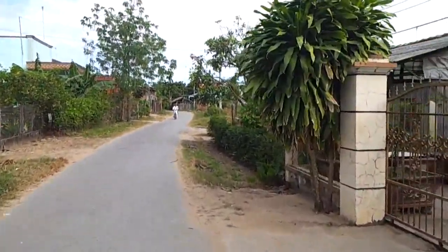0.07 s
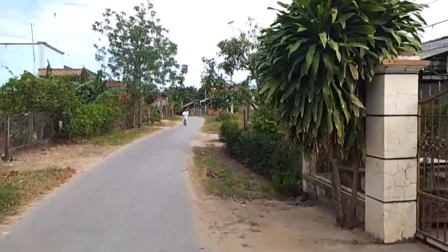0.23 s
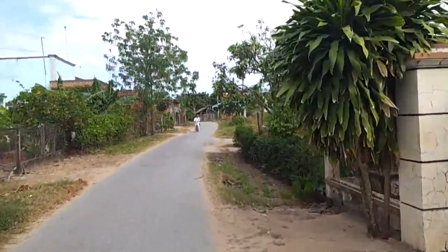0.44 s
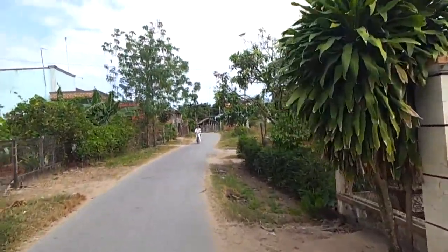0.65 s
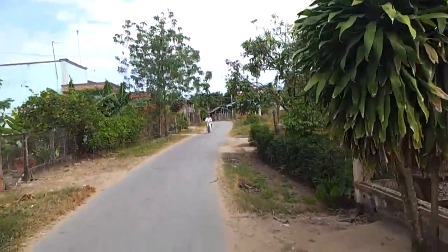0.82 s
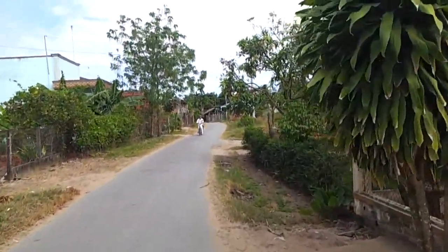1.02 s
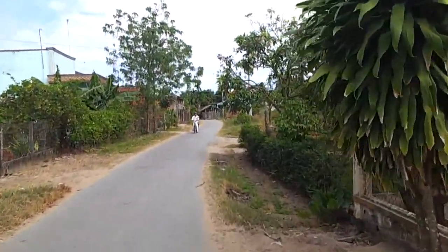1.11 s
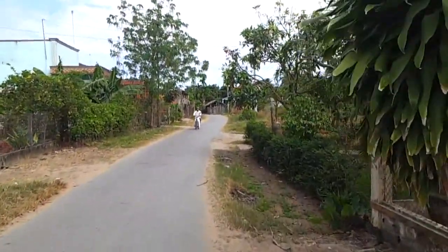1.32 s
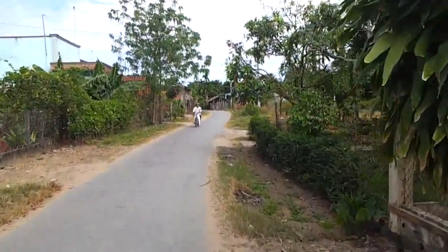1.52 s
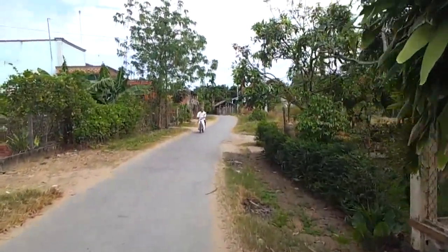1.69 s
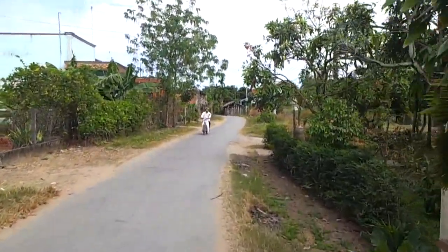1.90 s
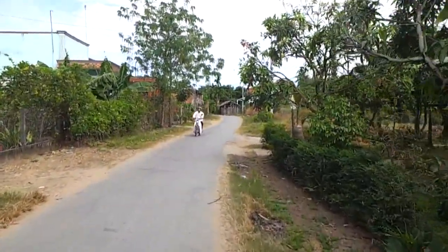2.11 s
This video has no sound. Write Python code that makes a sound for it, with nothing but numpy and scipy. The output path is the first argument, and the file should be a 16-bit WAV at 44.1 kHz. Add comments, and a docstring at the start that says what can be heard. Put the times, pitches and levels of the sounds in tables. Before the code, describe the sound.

An old bicycle squeaks close to the microphone, jumping between high and lower pitches as it rolls along a country lane. The freewheel ticks and tyres hiss throughout, while a head wind rumbles and pops on the microphone.

```python
"""Old bicycle in a head wind

A country lane between walls and hedges, with a stereo microphone close to a rolling bicycle.
Dry metal parts rub and squeal, jumping from pitch to pitch, while the freewheel ticks and the tyres hiss.
The head wind rumbles, pops and briefly overloads the microphone, mostly on the left."""
import sys
import numpy as np
from scipy import signal
from scipy.fft import rfft, irfft, next_fast_len
from scipy.io import wavfile
from scipy.ndimage import uniform_filter1d

SR = 44100
rng = np.random.default_rng(int(sys.argv[2]) if len(sys.argv) > 2 else 0)


def output_pcm(signal):
    """Save a mono or channel-first signal as 16-bit PCM at the path in sys.argv[1].

    Samples are clipped to [-1, 1] before scaling.
    """
    pcm = np.clip(np.atleast_2d(signal).T, -1, 1) * 32767
    wavfile.write(sys.argv[1], SR, np.round(pcm).astype(np.int16))


N = 94815
TIME = np.arange(N) / SR
RUB_ATTACK_S, RUB_RELEASE_S = 0.0057, 0.008
CUTOFF_HZ = 14350

# four long squeals, close up: (time [s], pitch [Hz], level before the squeal's gain [dB])
RISING = [(0.0, 6560, -24), (0.012, 6660, -33.5), (0.04, 6650, -26.5), (0.046, 6568, -37),
          (0.08, 6949, -27), (0.11, 6960, -46.5)]
LOUD = [(0.647, 5610, -30), (0.661, 5394, -28), (0.697, 5384, -37.5), (0.713, 5382, -23.5),
        (0.733, 5190, -37), (0.755, 5230, -48)]
THIN = [(0.872, 8373, -45), (0.882, 8380, -31.5), (0.9, 8380, -44), (0.92, 8420, -25), (0.984, 8180, -43.5),
        (1.034, 8070, -31), (1.05, 8140, -33.5), (1.075, 8140, -55)]
LOW = [(1.3, 2494, -42), (1.366, 2290, -39.5), (1.378, 2140, -30), (1.408, 2030, -27.5),
       (1.516, 2123, -44.5), (1.528, 2133, -31.5), (1.544, 2057, -25.5), (1.574, 2047, -45),
       (1.582, 2135, -51), (1.596, 2070, -23), (1.618, 2188, -46), (1.626, 1993, -27), (1.646, 2122, -40),
       (1.655, 2117, -54)]
# their voices: (curve, gain [dB], roughness [0-1], harmonics from the 2nd up [dB])
SQUEALS = [(RISING, 1.9, 0.24, [-11]), (LOUD, 2.1, 0.3, [-3]), (THIN, -.5, .18, []),
           (LOW, 0.42, 0.514, [-21, -23, -27, -22, -24])]
# short squeaks: (start [s], length [s], first, middle and last pitch [Hz], level [dB],
# 2nd harmonic [dB], 3rd [dB], 4th and 5th [dB], roughness [0-1])
SQUEAKS = [(.243, 0.024, 1673, 1640, 1710, -54, 1, -1, -14, 0.87),
           (.288, 0.023, 2990, 3030, 2992, -47.5, -15.5, -5, -20, 0.32),
           (.368, 0.034, 2320, 2250, 2420, -40.5, 5.5, -12, -4.5, 0.29),
           (0.421, 0.059, 2416, 2484, 2390, -42, -7, -25, -11, 0.096),
           (.484, 0.048, 3180, 3212, 3190, -29, -15, -8, -13, 0.21),
           (0.532, 0.02, 3260, 3070, 3000, -32, -8, -22, -23, 0.36),
           (.590, 0.041, 2480, 2492, 2420, -32, -8.5, -27.5, -26, 0.076),
           (1.205, 0.055, 3380, 3170, 3030, -49, -7, -21.5, -20, .6),
           (1.497, 0.023, 6350, 6420, 6340, -33.5, -6, -20, -20, 0.074),
           (2.069, 0.028, 8480, 8600, 8360, -35, -20, -20, -20, .1)]


def squeaks():
    """Dry metal sticks and slips, singing long squeals and short squeaks."""
    out = np.zeros((2, N))
    for curve, gain_db, rough, harmonics_db in SQUEALS:
        hz, db = in_time(curve)
        out += stick_slip(curve[0][0], curve[-1][0], hz, db + gain_db, rough, harmonics_db)
    for start, length, first, middle, last, db, second_db, third_db, higher_db, rough in SQUEAKS:
        hz = np.interp(TIME, start + np.linspace(0, length, 3), [first, middle, last])
        out += stick_slip(start, start + length, hz, db, rough, [second_db, third_db, higher_db, higher_db])
    return out


# how the microphone's two unequal sides colour the bicycle; the left favours high treble,
# the right most of 3-7 kHz: (frequency [Hz], left minus right [dB])
MIC_BALANCE = [(1600, 1), (2080, 3), (2480, -0.5), (3200, -12.5), (4600, 8), (5400, -16.5), (6800, -11),
               (8300, 7), (10800, 21.5), (13400, 13)]


def stick_slip(start, end, hz, db, rough, harmonics_db):
    """A rubbing contact sings one pitch with overtones; a rough grip shakes its pitch and level."""
    flutter_db = 8 * rough * drift(hz=71)
    level = gate(start, end, RUB_ATTACK_S, RUB_RELEASE_S) * from_db(db + flutter_db)
    wobble = 0.0237 * rough * drift(hz=128.4)
    on = level > 0
    phase = 2 * np.pi * np.cumsum((hz * (1 + wobble))[on]) / SR
    out = np.zeros((2, N))
    for k, harmonic_db in enumerate([0, *harmonics_db], 1):
        if k * hz.min() < CUTOFF_HZ:
            partial = np.sqrt(2) * from_db(harmonic_db) * level[on] * np.sin(k * phase)
            out[:, on] += sides(at_hz(MIC_BALANCE, k * hz[on])) * partial
    return out


# dry scrapes: (start [s], length [s], centre [Hz], width [Hz], level [dB])
SCRAPES = [(0.267, 0.0485, 2600, 700, -41), (0.265, 0.028, 4740, 1020, -42), (1.25, 0.03, 1530, 900, -36.5),
           (1.308, 0.035, 4820, 400, -43), (1.382, 0.015, 6000, 2000, -41.5),
           (1.609, 0.038, 2113, 280, -30), (1.617, 0.01, 3980, 300, -24.5),
           (1.618, 0.0092, 10520, 300, -29.5)]


def scrapes():
    """The contact rasps through a resonance without singing."""
    out = np.zeros((2, N))
    for start, length, hz, width_hz, db in SCRAPES:
        band_hz = [hz - width_hz / 2, hz + width_hz / 2]
        rasp = rms_one(filtered(rng.standard_normal(N), band_hz, "band"))
        level = from_db(db) * gate(start, start + length, RUB_ATTACK_S, RUB_RELEASE_S)
        out += sides(at_hz(MIC_BALANCE, hz)) * rasp * level
    return out


# the pawl's bright click: (frequency [Hz], relative level [dB])
TICK_COLOUR = [(1500, -60), (4000, 21), (5500, 3), (7300, -19), (9000, 13), (10200, -5), (11700, 20.5),
               (14000, -29)]


def freewheel(first_s=0.0065, gap_s=0.0367, slowing_s=0.000017, decay_s=0.0038):
    """The pawl drops over each tooth in turn, slowing slightly; each drop is a short tick."""
    drops = np.zeros(N)
    for k, db in enumerate(1.5 * rng.standard_normal(size=60)):
        drop_s = first_s + gap_s * k + slowing_s * k * k
        drops[TIME.searchsorted(drop_s):][:1] += from_db(db)
    envelope = signal.lfilter([1], [1, -np.exp(-1 / (decay_s * SR))], drops)
    ticks = envelope * noise(TICK_COLOUR) * from_db(-38 + 2.5 * TIME)  # growing louder
    balance_db = at_hz(MIC_BALANCE, np.fft.rfftfreq(N, 1 / SR))
    return irfft(rfft(ticks) * sides(balance_db), N)


# tyres and chain on the lane, each side: (frequency [Hz], relative level [dB])
ROLL_LEFT = [(100, 8.5), (600, -5), (1050, 2.5), (1380, -1.5), (1650, 2), (2500, -5), (4000, -14),
             (7000, -15), (9000, -10), (11500, -2.5), (13000, -9.5), (14500, -13)]
ROLL_RIGHT = [(100, 12.5), (600, 4.5), (1050, 2.5), (1380, -1.5), (1650, 2), (2500, -4.5), (4000, -2.5),
              (5500, -1.5), (7500, -11), (10000, -16.5), (14500, -31)]
# their level before the swell: (left [dB], right [dB])
ROLL_DB = [-40.5, -39.5]
# their slow swell: (time [s], gain [dB])
ROLL_SWELL = [(0, 0.5), (.3, 1.5), (.7, 1), (1.05, 1), (1.35, 3), (1.7, 3), (2.15, 4)]


def rolling():
    """Tyres and chain run with a grainy hiss."""
    swell_db, = in_time(ROLL_SWELL)
    grain_db = 1.26 * drift(hz=143)
    return np.array([noise(colour) * from_db(db + swell_db + grain_db)
                     for colour, db in zip((ROLL_LEFT, ROLL_RIGHT), ROLL_DB)])


# head wind right on the microphone: (time [s], left level [dB], right level [dB])
WIND = [(0, -28, -66), (.15, -27, -33), (.24, -29.5, -27), (.31, -32.5, -42), (.42, -27, -35),
        (.52, -28, -43), (.68, -31, -33), (.79, -21.5, -35), (.92, -22, -22.5), (.99, -30.5, -42),
        (1.06, -23, -26), (1.18, -23.5, -27.5), (1.35, -23, -29), (1.5, -23, -35.5), (1.62, -20, -22),
        (1.71, -24, -29), (1.82, -18, -31), (1.95, -25.5, -36), (2.15, -23, -23)]
# its rumble: (frequency [Hz], relative level [dB])
WIND_COLOUR = [(15, -0.5), (30, -1), (80, 2), (150, -3.5), (300, -15.5), (600, -26.5), (1200, -48.5),
               (3000, -65)]


def wind(lump_db=3, lump_hz=24.7):
    """Air flowing over the microphone makes a lumpy rumble, unrelated on the two sides."""
    return np.array([noise(WIND_COLOUR) * from_db(db + lump_db * drift(lump_hz)) for db in in_time(WIND)])


# gusts hitting the microphone: (start [s], length [s], level [dB], left minus right [dB])
GUSTS = [(0.195, 0.046, -25.5, -2.5), (0.565, 0.018, -17, 27), (0.587, .058, -12, 30),
         (0.65, 0.0326, -18.5, 24), (0.69, 0.077, -21.5, 33), (0.821, .016, -21, 9),
         (0.848, .02, -2.5, 45.5), (0.869, 0.027, -17, 33), (1.031, 0.035, -30, 12),
         (1.155, 0.022, -24.5, 5), (1.201, 0.0183, -21, 4.5), (1.324, 0.055, -27.5, 6.5),
         (1.477, 0.043, -23, -5.5), (1.781, 0.0225, -18, 19), (1.816, 0.019, -21.5, 6)]
# their low thud: (frequency [Hz], relative level [dB])
GUST_COLOUR = [(20, -41), (70, -19), (140, 10.5), (300, 0), (600, -15.5), (1200, -31), (3000, -47.5),
               (8000, -67)]


def gusts(edge_s=0.0041, even_s=0.0135):
    """Short, hard buffets, with separate turbulence at each microphone port."""
    air = np.array([noise(GUST_COLOUR), noise(GUST_COLOUR)])
    local_rms = np.sqrt(uniform_filter1d(air ** 2, int(even_s * SR), axis=1) + 1e-9)
    level = sum(sides(balance_db) * from_db(db) * gate(start, start + length, edge_s, edge_s)
                for start, length, db, balance_db in GUSTS)
    return air / local_rms * level


# single eddies on the microphone:
# (time [s], depth before filtering [dB], half width [ms], left minus right [dB])
POPS = [(.114, -13.5, 0.74, -22), (0.2114, -3, 1.53, 25.5), (0.223, -18.5, 1.8, -28),
        (0.4075, -8.5, 0.94, 32.5), (0.4177, 1, 0.737, 25), (0.575, -4, 0.55, 31), (0.589, 3.5, 0.51, 26),
        (0.5974, -3, 0.87, 30), (0.6135, 13.5, 0.5, 45.5), (0.622, 4.5, 0.87, 28), (.629, -1.5, 0.2, 30),
        (0.6392, 9.5, 0.29, 45), (0.6607, 0.5, 0.75, 30), (0.676, -3.5, 0.76, -38), (0.697, -9, 0.66, -17),
        (0.723, -6, 0.62, 18.5), (.830, -4.5, 0.48, 20), (.848, 10.5, 0.76, 48), (0.8548, 10, 0.82, 42),
        (0.8623, 1, 1.4, 38), (0.876, -3.5, 0.66, 30), (1.093, -6.5, 1.34, 17.5), (1.157, -9, 1.05, -18.5),
        (1.332, -5.5, 2.3, 19), (1.746, -7.5, 0.48, -20), (1.793, -4, 4.1, 31), (1.8101, 4.5, 0.23, 31),
        (1.880, -4.5, 1.44, 32.5)]


def pops():
    """Each eddy is a pointed dip in pressure that swings back; smaller eddies carry less bass."""
    out = np.zeros((2, N))
    for centre_s, db, half_width_ms, balance_db in POPS:
        half_width_s = half_width_ms / 1000
        dip = -from_db(db) * np.exp(-np.minimum(abs(TIME - centre_s) / half_width_s, 30))
        out += sides(balance_db) * filtered(dip, hz=0.079 / half_width_s, kind="high")
    return filtered(out, hz=1260, kind="low", order=5)


def lane(sound, t60_s=0.314, delay_s=0.0039, db=-11.5):
    """Walls and hedges scatter a short tail back to the microphone."""
    t = TIME[:SR // 2]
    tails = rng.standard_normal((2, len(t))) * from_db(-60 * t / t60_s) * (t > delay_s)
    tails /= np.sqrt(np.sum(tails ** 2, axis=1, keepdims=True))
    return from_db(db) * signal.fftconvolve(sound, tails, axes=1)[:, :N]


def from_db(db):
    return 10 ** (np.asarray(db) / 20)


def rms_one(x):
    return x / np.sqrt(np.mean(x ** 2) + 1e-20)


def filtered(x, hz, kind, order=2):
    return signal.sosfilt(signal.butter(order, hz, kind, fs=SR, output="sos"), x)


def in_time(rows):
    """The columns of a table as curves over time."""
    times, *columns = np.transpose(rows)
    return [np.interp(TIME, times, column) for column in columns]


def at_hz(points, hz):
    """Reads a spectrum on a log-frequency axis."""
    points_hz, points_db = np.transpose(points)
    return np.interp(np.log(hz + 1e-9), np.log(points_hz), points_db)


def noise(colour):
    """Noise with the given spectrum; rms 1."""
    size = next_fast_len(N)
    gains = from_db(at_hz(colour, np.fft.rfftfreq(size, 1 / SR)))
    return rms_one(irfft(rfft(rng.standard_normal(size)) * gains, size)[:N])


def drift(hz):
    """Random motion slower than hz; rms 1."""
    return rms_one(filtered(rng.standard_normal(N + SR), hz, "low")[SR:])


def sides(balance_db):
    """Left and right gains of mean power 1."""
    ratio = from_db(np.atleast_1d(balance_db))
    return np.array([ratio, np.ones_like(ratio)]) * np.sqrt(2 / (1 + ratio ** 2))


def gate(start, end, attack, release):
    """Rises, holds and falls, with rounded corners."""
    ramp = np.minimum((TIME - start) / attack, (end - TIME) / release + .5)
    return np.sin(np.pi / 2 * np.clip(ramp, 0, 1)) ** 2


def scene(left_lag_s=0.00013):
    """The bicycle in the lane, reaching the right port first, with wind on the microphone."""
    left, right = squeaks() + scrapes() + freewheel()
    bicycle = np.array([np.roll(left, round(left_lag_s * SR)), right])
    return bicycle + lane(bicycle) + rolling() + wind() + gusts() + pops()


def record(dry):
    """The strongest wind peaks clip flat at the microphone; the top treble is cut."""
    treble_cut = signal.ellip(12, .1, 80, CUTOFF_HZ, fs=SR, output="sos")
    return signal.sosfilt(treble_cut, np.clip(dry, -1, 1))


dry = scene()
out = record(dry)
output_pcm(out)
```